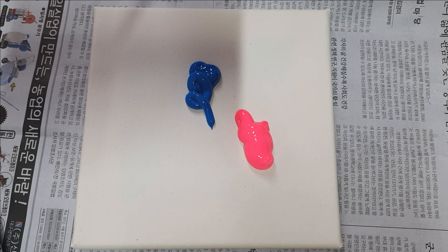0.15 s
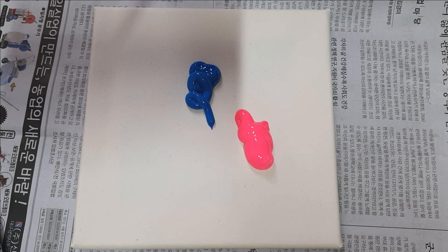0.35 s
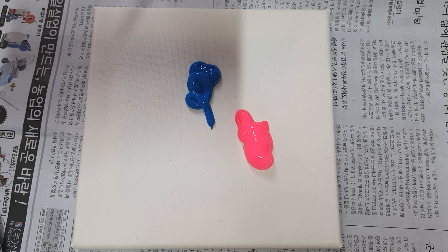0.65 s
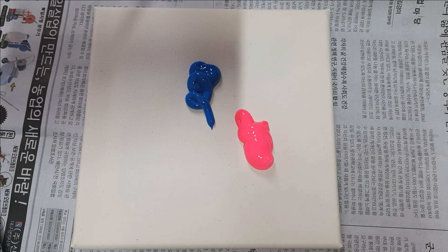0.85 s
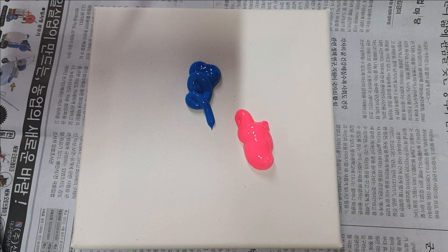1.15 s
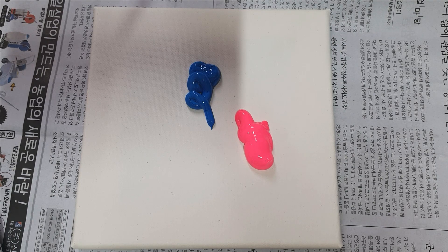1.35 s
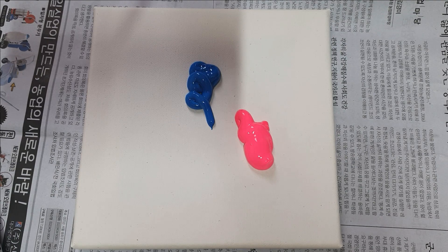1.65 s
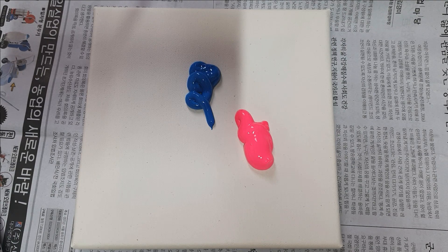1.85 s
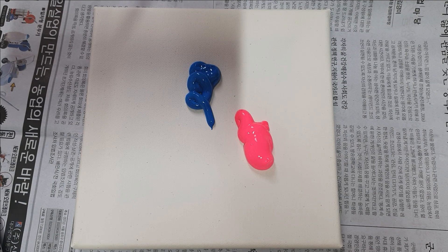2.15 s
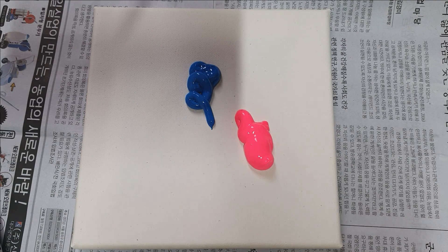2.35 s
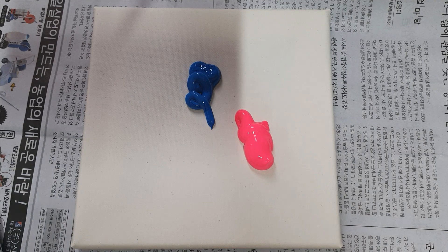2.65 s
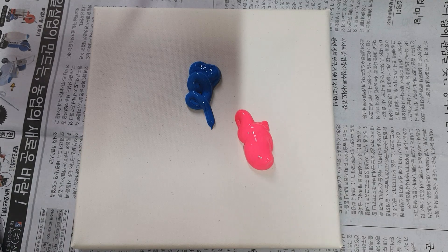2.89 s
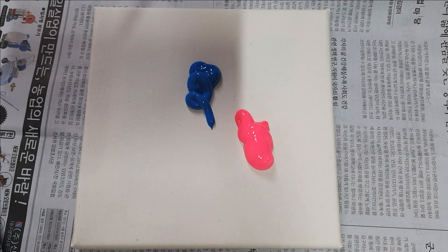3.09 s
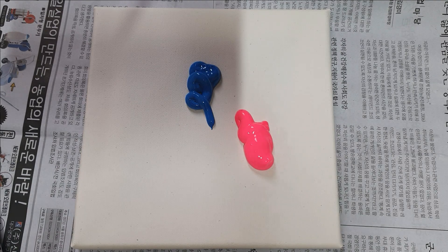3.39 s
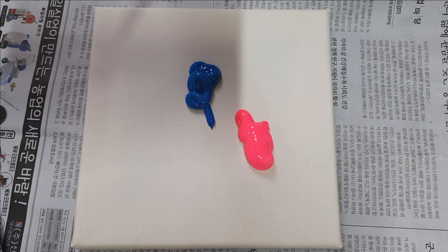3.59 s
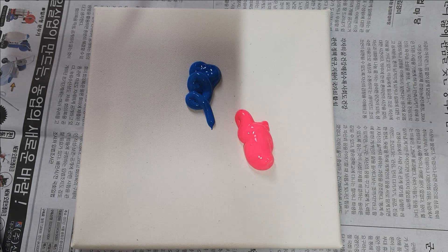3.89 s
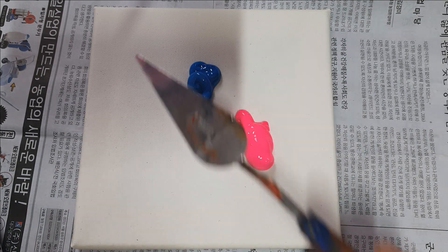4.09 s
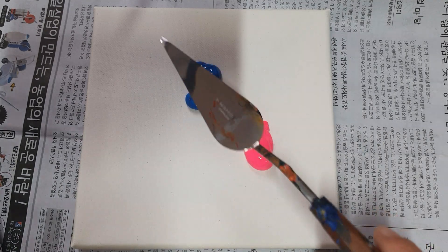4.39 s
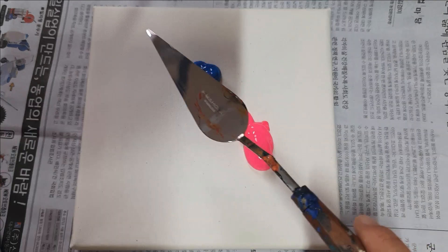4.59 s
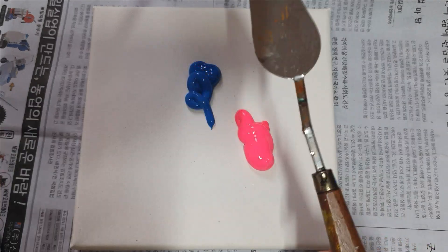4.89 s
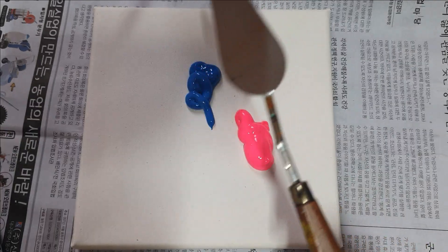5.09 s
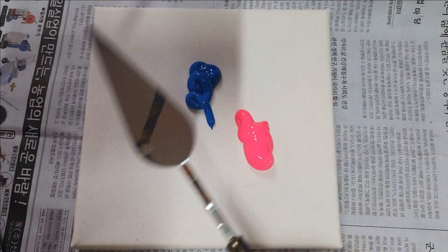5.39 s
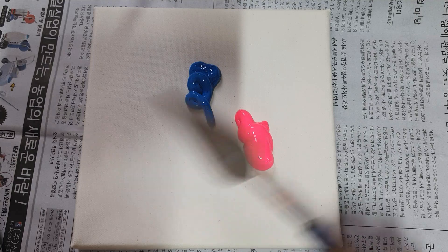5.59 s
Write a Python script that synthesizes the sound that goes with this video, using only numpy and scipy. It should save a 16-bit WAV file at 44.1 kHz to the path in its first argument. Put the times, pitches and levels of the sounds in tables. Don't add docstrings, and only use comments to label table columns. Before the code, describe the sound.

Steel palette knives and wooden handles clatter brightly in a bunch, knocking in irregular bursts, with short rings and brief scrapes, then quiet room hum.

```python
import sys
import numpy as np
from scipy import signal
from scipy.fft import rfft, irfft
from scipy.io import wavfile
from scipy.ndimage import uniform_filter1d

SR = 44100
rng = np.random.default_rng(int(sys.argv[2]) if len(sys.argv) > 2 else 0)


def persist_wave(psi):
    counts = np.round(np.clip(psi, -1, 1) * 32767).astype(np.int16)
    wavfile.write(sys.argv[1], SR, np.atleast_2d(counts).T)


def voltage_ratio(level):
    return 10 ** (np.asarray(level, float) / 20)


N = 253134
SPAN = 8192

# start in seconds, peak level in dB, brightness in dB,
# frequency of the struck blade in Hz, rattle level in dB.
BLOWS = [(0.143, -42.5, -6.5, 3360, -20), (0.2172, -31.5, -15, 2710, 23), (0.2382, -23, -4.5, 5220, -11),
         (0.397, -37, -12, 3400, -36), (0.435, -37.5, -18, 3630, -28), (0.5465, -29.5, -5.5, 4530, -40),
         (0.5594, -36.5, -15, 3760, 1), (0.8583, -26.5, -7.5, 3650, 15), (0.8778, -26.5, -4, 5330, 16),
         (0.908, -39.5, 2, 5080, 15), (1.2503, -23.5, -2.5, 2860, -27), (1.2744, -36.5, -7, 2650, 8),
         (1.3949, -20, -9, 2680, -8.5), (1.536, -25.5, -7.5, 2605, -28), (1.7222, -25.5, -0.5, 3370, 6),
         (1.784, -26, -5.5, 3560, -7), (1.8646, -28.5, 0.5, 3760, -30), (2.6754, -9.5, -7.5, 3780, -11),
         (2.8504, -19, -8, 3565, -10), (2.9954, -18, -11.5, 3810, -9.5), (3.148, -11.5, -12.5, 3750, -33),
         (3.2835, -30.5, -8.5, 3800, -10), (3.5148, -13.5, -6.5, 4480, -6), (3.6842, -25, -6.5, 3610, -11)]
# start in seconds, peak level in dB,
# brightness in dB, frequency of the struck blade in Hz.
TICKS = [(0.2595, -41.5, -29, 3380), (0.333, -47, -30, 2700), (0.493, -50, -26, 3070),
         (0.511, -49, -33, 3300), (0.5842, -42, -20, 2640), (0.767, -48.5, -19, 3730),
         (0.819, -55, -20, 3450), (0.9232, -42, 6.5, 4670), (1.2515, -21.5, -6.5, 2630),
         (1.8438, -46, -14, 2750), (1.8752, -30.5, -17.5, 3365), (1.983, -61, -12, 3200),
         (2.6894, -27, -36, 3450), (2.9991, -18, -7.5, 3720), (3.171, -23.5, -11, 3600),
         (3.2278, -39, -7, 3030), (3.2915, -26.5, -6.5, 2620), (3.317, -37, 3, 4650),
         (3.3327, -32, -6.5, 5000), (3.523, -19.5, -11, 3540), (4.0104, -52, -16.5, 4300),
         (4.6124, -58.5, -17, 4460), (4.8646, -65.5, -4.5, 4750)]
# frequency in Hz, level in dB, decay time T60 in seconds.
BUNCH_MODES = [(2319, -16, 0.031), (2750, -2, .03), (2912, -15, 0.021), (3120, -20, 0.09),
               (3450, -16.5, 0.011), (3620, -15, .03), (3575, -9.5, 0.064), (3890, -3, 0.035),
               (4606, 0.5, 0.03), (5580, -4, 0.0064), (7530, -10, .03), (8760, -5, 0.012),
               (9580, -14, 0.03), (11340, -6, 0.005), (12600, -19.5, 0.013)]
# frequency in Hz, level in dB.
CRACK_SPECTRUM = [(300, -41), (800, -20.5), (1500, -19), (2500, -12.5), (4000, 2.5), (5500, -0.5),
                  (7000, -8.5), (10000, -8), (13000, -11.5), (15500, -14), (16300, -40.5)]
# start in seconds, peak level in dB, low mode over high mode in dB.
HANDLE_KNOCKS = [(0.2179, -41.5, -3), (0.2383, -32.5, 2), (0.33, -45.5, 1.5), (0.398, -45, -10),
                 (0.433, -47.5, 2), (0.511, -33.5, -38), (0.524, -38, -20), (0.5489, -42, 8),
                 (0.5562, -34.5, -7.5), (0.583, -40, 6), (0.859, -42.5, -2), (0.8773, -39, -9),
                 (1.2512, -40, 28), (1.2755, -50, -8), (1.3983, -44.5, 3), (1.536, -56, 1.5),
                 (1.721, -44, 5), (1.7851, -33, 12), (1.8639, -35, 7), (1.876, -41, -9),
                 (1.986, -53.5, -30), (2.6755, -23.5, -4), (2.85, -35, -9), (2.9961, -29, -30),
                 (3.0019, -31.5, 9), (3.1492, -20, -9.5), (3.167, -43, 30), (3.286, -32, 3),
                 (3.5161, -28.5, -7), (3.686, -36, 10)]
# frequency in Hz, decay time T60 in seconds.
HANDLE_MODES = [(1120, .04), (1395, .07), (1750, .025)]
# start
# in seconds, frequency in Hz, level in dB, decay time T60 in seconds.
FREE_RINGS = [(.397, 3520, -46, .05), (.434, 3500, -43, .05), (.858, 7000, -47, .22),
              (1.251, 7080, -46, .28), (1.395, 6750, -64, .35), (1.536, 6720, -66, .35),
              (1.722, 3495, -58, .4), (1.722, 7090, -41, .26), (1.722, 8706, -51, .15),
              (1.784, 3535, -64, .3), (2.675, 8724, -66, .2), (2.85, 3480, -57, .45),
              (2.85, 6700, -62, .38), (2.85, 7100, -47, .12), (2.85, 8720, -61, .16),
              (2.997, 6780, -64, .3), (2.997, 7100, -38, .14), (2.997, 8777, -63, .25),
              (3.148, 1400, -38, .18), (3.148, 7090, -47, .36), (3.285, 7094, -44, .2),
              (3.33, 3513, -59, .5), (3.33, 6760, -58, .34), (3.33, 8780, -48, .2), (3.515, 1405, -54, .5),
              (3.515, 3545, -53, .5), (3.515, 6820, -46, .38), (3.515, 7112, -37, .28),
              (3.686, 3555, -62, .5), (3.686, 7122, -71, .25)]
# frequency in Hz, level in dB, decay time T60 in seconds.
EARLIER_RINGS = [(4172, -4, .4), (4770, -3, .25), (5992, -1, .3), (6374, -9, .2), (7537, -11, .5),
                 (9437, -17, .5), (14500, -17, .23), (14790, -14, .21)]
# start in seconds, length in seconds, start level in dB, end level in dB,
# share of the blade body in dB.
SLIDES = [(0.222, 0.17, -60, -71.5, 5), (.555, 0.063, -43.5, -93, 0), (0.753, 0.11, -74, -77, 4.5),
          (0.901, 0.061, -44, -93, -10), (1.917, 0.14, -79, -85, -1), (2.02, .19, -77, -73.5, -5),
          (2.57, 0.065, -89, -80, 9.5), (3.17, 0.085, -60.5, -70, 2), (3.221, 0.097, -60, -77, -5),
          (3.323, 0.085, -42, -83, -7.5), (3.84, 0.071, -87, -85, -14.5), (4.008, 0.063, -83, -87, -14)]
# start in seconds, peak level in dB, board pitch in Hz,
# decay time T60 in seconds.
TABLE_KNOCKS = [(0.214, -54.5, 136, 0.39), (0.231, -45.5, 197, 0.19), (0.546, -51, 142, 0.18),
                (1.393, -55, 195, 0.082), (1.782, -56, 153, 0.14), (2.686, -46.5, 154, 0.052),
                (2.848, -52, 197, 0.078), (2.996, -44, 151, 0.035), (3.149, -48, 144.5, 0.19),
                (3.281, -57, 150, 0.16), (3.516, -52.5, 137, 0.15)]
# frequency in Hz, density in dB per Hz.
AIR_SPECTRUM = [(12, -65), (20, -44), (73, -4.5), (91, -7.5), (120, -10), (217, -17), (263, -11),
                (576, -23), (797, -21.5), (1070, -21.5), (1410, -21), (6250, -33.5), (10200, -45)]
# frequency in Hz, bandwidth in Hz, level in dB.
DUCT_MODES = [(87.4, 9.7, 2), (277, 13, -16), (814, 29, 8.5), (723, 26, 4.5)]
# frequency in Hz, likeness from 0 to 1.
PORT_LIKENESS = [(30, 0.4), (200, 1), (500, .6), (1000, 0.44), (2000, .0), (16000, 0.11)]


def shape(points, hz):
    f, v = np.transpose(points)
    return np.interp(np.log(np.maximum(hz, 1)), np.log(np.maximum(f, 1)), v)


def unit(x):
    return x / np.sqrt(np.mean(x ** 2))


def add(out, x, s):
    i = int(round(s * SR))
    out[..., i:i + x.shape[-1]] += x[..., :N - i]


def ring(hz, t60, count):
    t = np.arange(count) / SR
    return np.sin(2 * np.pi * hz * t) * np.exp(-np.log(1000) * t / max(t60, .005))


def mode(hz, t60):
    return rfft(ring(hz, t60, count=SPAN)) / np.sqrt(t60 * SR)


def walk(rate):
    k = int(SR / rate)
    steps = np.repeat(rng.standard_normal(N // k + 1), k)
    return uniform_filter1d(uniform_filter1d(steps, k), k)[:N]


def grit(count, rate, spread_db):
    noise = rng.standard_normal(count)
    contact = rng.random(count) < rate / SR
    size = np.minimum(rng.exponential(1, count), 3)
    return unit(noise * (0.75 + contact * voltage_ratio(5.5 + spread_db * size)))


def blow(rattle_db, crack_s, rattle_t60):
    t = np.arange(SPAN) / SR
    force = np.exp(-t / crack_s) + voltage_ratio(rattle_db) * np.exp(-np.log(1000) * t / rattle_t60)
    onset = np.minimum(t / .0004, 1)
    return rfft(force * onset * grit(SPAN, 3500, 3.5))


def bunch(grip=0.86):
    return np.array([voltage_ratio(db) * mode(hz, t60) for hz, db, t60 in np.array(BUNCH_MODES) * grip])


def clacks():
    out, hz = np.zeros(N), np.fft.rfftfreq(SPAN, 1 / SR)
    soft = voltage_ratio(shape([(500, -30), (2000, 0)], hz))
    crack = voltage_ratio(shape(CRACK_SPECTRUM, hz))
    count = len(BUNCH_MODES)
    grips = [bunch(1 + rng.standard_normal((count, 3)) * [.025, 0, .1]) for _ in range(8)]
    tick_rattle_db = -14.5
    events = [*BLOWS, *[(*row, tick_rattle_db) for row in TICKS]]
    for k, (s, db, bright_db, part_hz, rattle_db) in enumerate(events):
        mix = voltage_ratio(3.0 * rng.standard_normal(count) - 6)
        struck = voltage_ratio(6.5) * mode(part_hz, 0.018)
        edge = voltage_ratio(-14.0) * mode(2.2 * part_hz, 0.013)
        body = soft * (mix @ grips[k % 8] + struck + edge) + crack
        colour = voltage_ratio(shape([(4800, 0.071), (7000, bright_db + 15.5)], hz))
        clack = irfft(blow(rattle_db, 0.0032, 0.062) * body * colour)[:-256]
        add(out, voltage_ratio(db) * clack / np.abs(clack).max(), s - .0004)
    return out


def handles():
    out, hz = np.zeros(N), np.fft.rfftfreq(SPAN, 1 / SR)
    soft = voltage_ratio(shape([(250, -29), (1000, -1.0)], hz))
    mid_db, rattle_db, contact_s = -12, -10.5, .0018
    scatter = .025
    for s, db, low_db in HANDLE_KNOCKS:
        body = 0
        for share_db, (f, t60) in zip((low_db / 2, mid_db, -low_db / 2), HANDLE_MODES):
            body = body + voltage_ratio(share_db) * mode(f * (1 + scatter * rng.standard_normal()), t60)
        knock = irfft(blow(rattle_db, contact_s, 0.061) * body * soft)[:-256]
        add(out, voltage_ratio(db) * knock / np.abs(knock).max(), s)
    return out


def blades():
    out, starts = np.zeros(N), np.append(np.array(FREE_RINGS)[:, 0], N / SR)
    for s, hz, db, t60 in FREE_RINGS:
        next_s = starts[starts > s].min()
        t = np.arange(int((next_s - s) * SR)) / SR
        grip = np.minimum(t / 0.009, 1) * np.minimum((t[-1] - t) / .002, 1)
        partner = ring(hz + 35 * rng.standard_normal(), .6 * t60, count=len(t))
        add(out, voltage_ratio(db) * grip * (ring(hz, t60, count=len(t)) + .3 * partner), s)
    for hz, db, t60 in EARLIER_RINGS:
        out += voltage_ratio(db - 66.0) * ring(hz, t60, count=N)
    return out


def slides():
    hz, t = np.fft.rfftfreq(N, 1 / SR), np.arange(N) / SR
    rub = np.clip(grit(N, 900, 4.0), -6, 6) * voltage_ratio(4.5 * walk(90))
    colour = voltage_ratio(shape([(1500, -53.0), (4000, -4), (9000, 7.0), (13000, 8.5),
                        (15500, -8.5), (16500, -30.5)], hz))
    hiss = unit(irfft(rfft(rub) * colour, N))
    body = unit(signal.fftconvolve(rub, irfft(bunch().sum(axis=0)))[:N])
    rise_s, fall_s = .01, .035
    out = np.zeros(N)
    for s, length, start_db, end_db, body_db in SLIDES:
        edge = np.clip(np.minimum((t - s) / rise_s, (s + length - t) / fall_s), 0, 1)
        level = voltage_ratio(np.interp(t, [s, s + length], [start_db, end_db]))
        out += edge * level * (hiss + voltage_ratio(body_db) * body)
    return out


def table_top():
    out = np.zeros(N)
    onset = np.minimum(np.arange(2 * SPAN) / SR / 0.0013, 1)
    partials = [(.25, -27.5), (.72, -13), (1, 2), (1.35, -5.5), (2.6, -2)]
    for s, db, hz, t60 in TABLE_KNOCKS:
        thud = sum(voltage_ratio(a) * ring(k * hz, t60 / k, count=2 * SPAN) for k, a in partials)
        add(out, voltage_ratio(db) * thud * onset, s)
    return out


def room(x, t60, damp_hz):
    t = np.arange(SPAN // 2) / SR
    noise = rng.standard_normal((2, len(t))) * np.clip((t - .001) / 0.0081, 0, 1)
    dull = signal.lfilter(*signal.butter(1, damp_hz, fs=SR), noise)
    dull_decay = np.exp(-np.log(1000) * t / t60)
    bright_decay = np.exp(-np.log(1000) * t / (1.086 * t60))
    wash = dull * dull_decay + (noise - dull) * bright_decay
    return signal.fftconvolve(x[None], wash / np.sqrt(np.sum(wash ** 2) / 2), axes=1)[:, :N]


def patchy_hiss():
    band = signal.butter(4, [9500, 12300], "band", fs=SR, output="sos")
    top_hiss = unit(signal.sosfilt(band, rng.standard_normal((2, N))))
    patchy_db = 9 * unit(walk(24)).clip(-3, 1.5)
    return top_hiss * voltage_ratio(-101 + patchy_db)


def air():
    hz = np.fft.rfftfreq(N, 1 / SR)
    duct = 1 + sum(voltage_ratio(db) / (1 + (2 * (hz - f) / w) ** 2) for f, w, db in DUCT_MODES)
    colour = voltage_ratio(shape([*AIR_SPECTRUM, (12200, -70), (13000, -96.5)], hz)) * duct
    alike = np.clip(shape(PORT_LIKENESS, hz), -.9, 1)
    mid = rfft(rng.standard_normal(N)) * colour * np.sqrt(1 + alike)
    side = rfft(rng.standard_normal(N)) * colour * np.sqrt(1 - alike)
    ports = np.array([mid + side, mid - side])
    out = 0
    for octave in np.arange(5, 15):
        band = np.clip(1 - np.abs(np.log2(np.maximum(hz, 32)) - octave), 0, 1)
        swell = voltage_ratio(1.2 * walk(7))
        out = out + swell * irfft(ports * band, N)
    port_db = np.array([[-.45], [.45]])
    return unit(out) * voltage_ratio(-67 + 3.5 + port_db)


def scene():
    knives = clacks() + handles() + blades() + slides()
    far = np.roll(knives, 13)
    far = voltage_ratio(-4.5) * signal.lfilter(*signal.butter(1, 14000, fs=SR), far)
    direct = np.array([far, voltage_ratio(6.5) * knives])
    thuds = table_top() * voltage_ratio(np.array([[-.5], [.5]]))
    return direct + voltage_ratio(-2.5) * room(knives, 0.07, 5000) + thuds + air() + patchy_hiss()


def band_limit(x):
    return signal.sosfilt(signal.butter(12, 17000, fs=SR, output="sos"), x)


def record(dry):
    top_cut = signal.ellip(8, .2, 60, 16200, fs=SR, output="sos")
    mix = signal.sosfilt(top_cut, dry)
    return band_limit(mix)


dry = scene()
out = record(dry)
persist_wave(out)
```